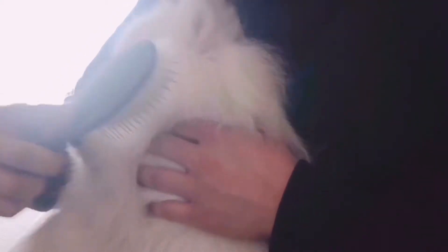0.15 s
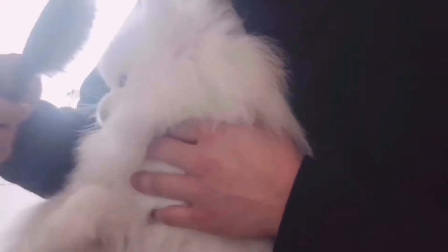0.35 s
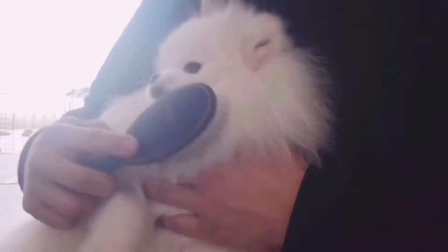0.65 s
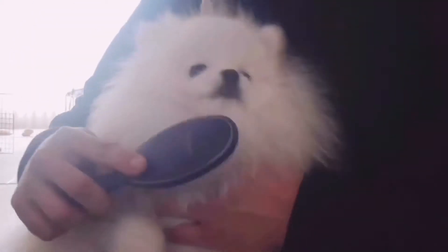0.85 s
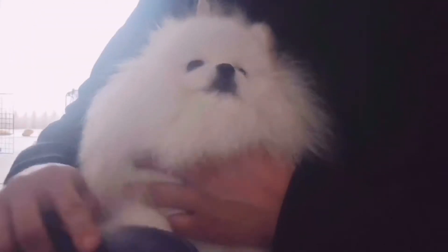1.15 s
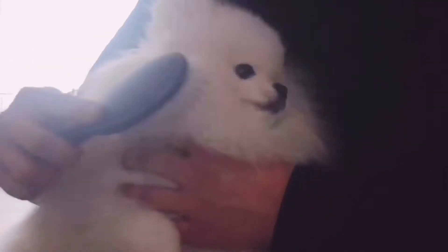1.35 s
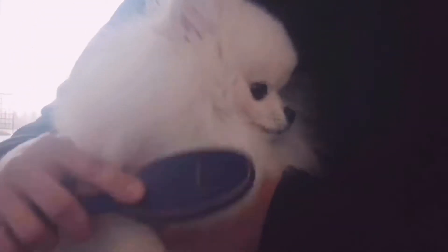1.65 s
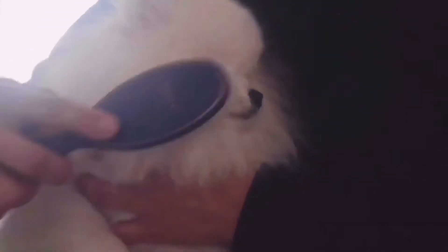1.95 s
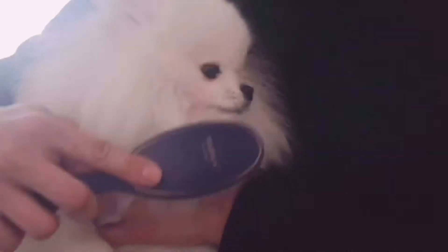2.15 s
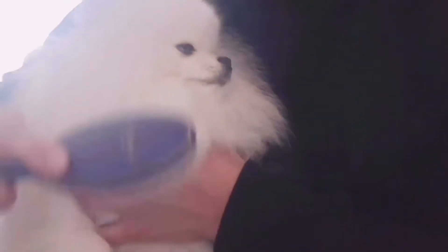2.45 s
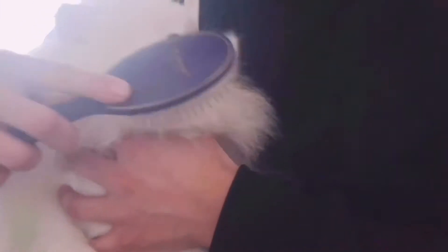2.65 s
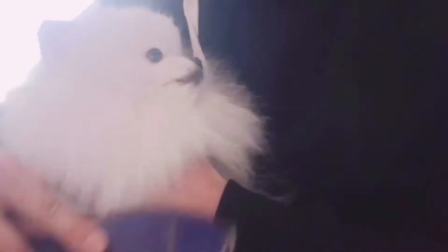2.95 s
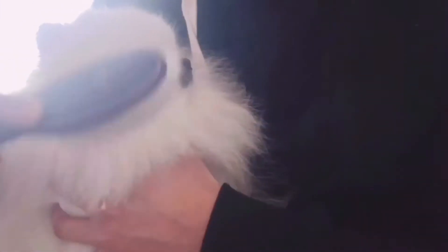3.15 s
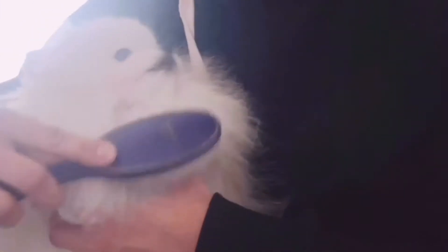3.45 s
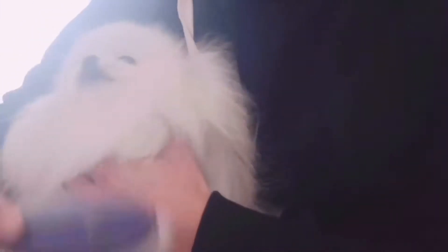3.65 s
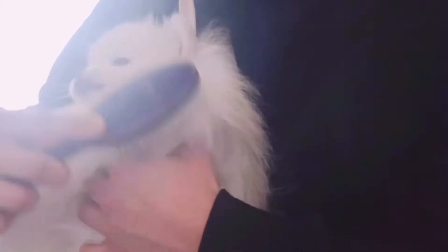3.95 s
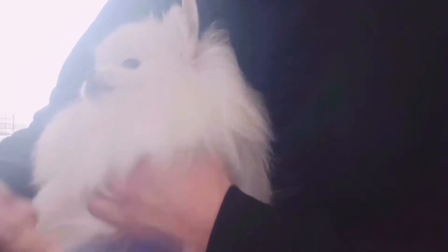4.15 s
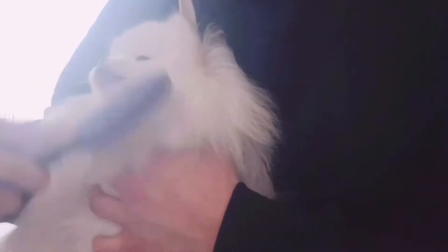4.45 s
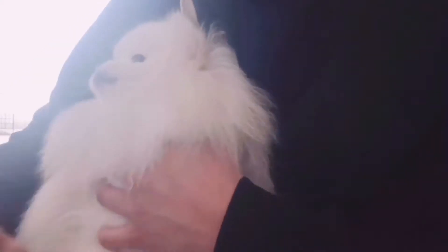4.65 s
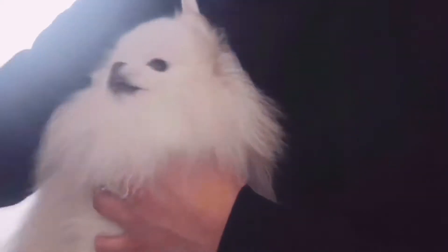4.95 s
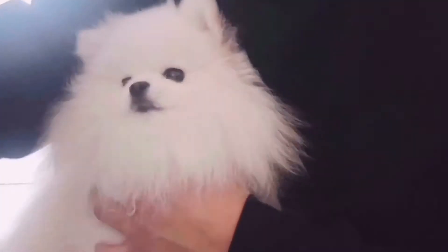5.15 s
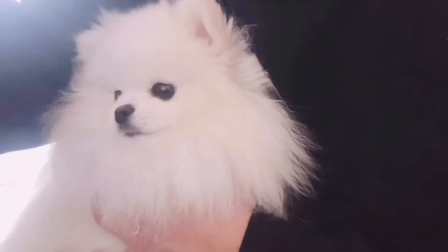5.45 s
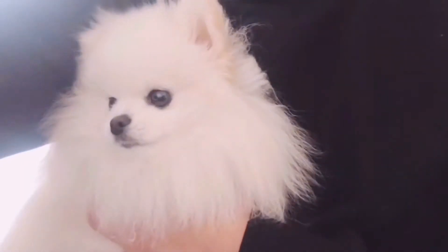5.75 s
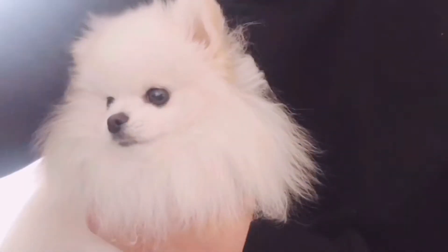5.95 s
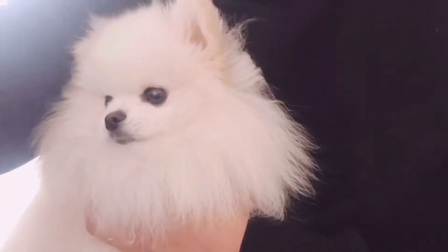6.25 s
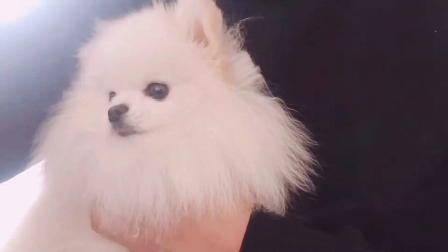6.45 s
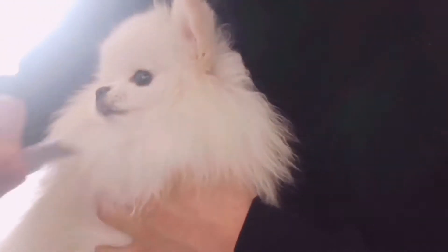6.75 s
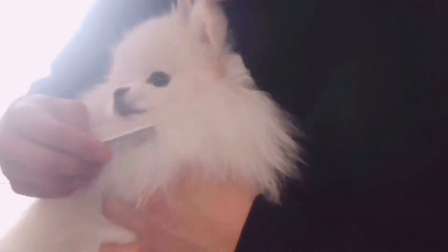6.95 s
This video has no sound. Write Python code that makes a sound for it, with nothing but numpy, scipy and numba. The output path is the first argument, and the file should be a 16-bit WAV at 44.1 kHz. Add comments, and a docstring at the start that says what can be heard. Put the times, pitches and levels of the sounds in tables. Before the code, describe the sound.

A close microphone in a quiet, lightly reverberant room, with faint low air and hum and a barely audible thin whine. From 0.6 s a bristle brush scuffs through a small dog's dry coat: short hissing strokes with a muffled, falling thrum at about 0.6, 1.0, 1.6-1.75, 2.25, 2.95, 3.55, 4.1 and 4.6 s. Tangles snap and pop, thickest around 1.05 s and 3.0 s; soft airy swishes and tiny static ticks fall between, a few near 4.9 s. Very faint bird-like whistles come at 0.4-1.0 and 3.6-3.9 s. After 5.1 s it quiets. At 5.62 s hard plastic knocks the table loudly, skids with a fading grind and small rising squeak, then knocks harder at 5.85 s. At 6.09 s a comb catches, thuds again near 6.28 s, and drags with a sinking hollow boom, rasp and toothy hiss until about 6.4 s. Only room tone remains.

```python
"""A small dog's thick coat is brushed close by in a quiet room, with faint whistles, perhaps a bird's.
First, strokes: random bristle slips hiss and thrum the pad, lower as hair pulls out; tangles snap free as
noise bursts, static ticks, and soft airy noise swishes. Then the brush is put down: knock (decaying modes),
short sinking slide (slip noise, rising squeak), knock. Last, a comb is dragged off the table: boom, rasp, hiss.
Throughout, filtered-noise air and hum and a thin whine; decaying noise adds the room's ring."""
import sys
import numpy as np
from scipy import signal
from scipy.fft import rfft, irfft
from scipy.io import wavfile
from scipy.ndimage import uniform_filter1d, map_coordinates
from numba import njit

SR = 44100
rng = np.random.default_rng(int(sys.argv[2]) if len(sys.argv) > 2 else 0)


def put_to_file(sound):
    """Save the sound as 16-bit audio at rate SR, in the file named by the first command-line argument."""
    columns = np.atleast_2d(sound).T  # one column per channel
    safe = np.clip(columns, -1, 1)
    whole_steps = np.round(safe * 32767)
    wavfile.write(sys.argv[1], SR, whole_steps.astype(np.int16))


N = 312669
TIME = np.arange(N) / SR


def amp(db):
    """Decibels to gain."""
    return 10 ** (np.asarray(db) / 20)


def unit(x):
    """Scale to rms 1."""
    return x / np.sqrt(np.mean(x ** 2))


def noise(size=N):
    """White noise."""
    return rng.standard_normal(size)


def walk(rate_hz):
    """Smooth random wandering, rms 1, through rate_hz random knots per second."""
    knots = noise(1000)
    return unit(map_coordinates(knots, [TIME * rate_hz], mode="wrap"))


def slips(rate_hz, spread_db):
    """Friction: tiny slips at random moments; spread_db skews their random sizes."""
    hits = rng.random(N) < rate_hz / SR
    return hits * noise() * amp(spread_db * np.minimum(rng.exponential(size=N), np.pi))


def along(points, hz):
    """Read (f/Hz, value) points on a log-frequency axis."""
    f, value = np.transpose(points)
    return np.interp(np.log(np.maximum(hz, 1)), np.log(f), value)


def colour(x, points, size=4096):
    """Causal minimum-phase filter with the given (f/Hz, level/dB) spectrum, via the cepstrum."""
    level_db = along(points, np.fft.rfftfreq(size, 1 / SR))
    cepstrum = irfft(np.log(amp(level_db)))
    cepstrum[1:size // 2] *= 2
    cepstrum[size // 2 + 1:] = 0
    response = irfft(np.exp(rfft(cepstrum)))
    return signal.fftconvolve(x, response)[:len(x)]


def ring(x, modes):
    """A body's resonances in parallel: (f/Hz, width/Hz, level/dB)."""
    return sum(amp(db) * signal.lfilter(*signal.iirpeak(hz, hz / width, fs=SR), x)
               for hz, width, db in modes)


@njit
def sweep(x, hz, damping):
    """Band-pass with a moving centre; damping is bandwidth over centre."""
    y, band, low = np.empty(len(x)), 0., 0.
    for i in range(len(x)):
        g = np.tan(np.pi * hz[i] / SR)
        v = (band + g * (x[i] - low)) / (1 + g * (g + damping))
        band, low, y[i] = 2 * v - band, low + 2 * g * v, damping * v
    return y


def swell(s, hold_s, rise_s, fall_s):
    """Gain that rises to 1 at time s, holds and falls; rise and fall times are per 20 dB."""
    before = (s - TIME) / max(rise_s, 1e-3)
    after = (TIME - s - hold_s) / max(fall_s, 1e-3)
    return amp(-20 * np.clip(np.maximum(before, after), 0, 10))


def fade(s, db_per_s):
    """Gain that sinks (negative rate: grows) steadily for up to 1 s from time s."""
    return amp(-db_per_s * np.clip(TIME - s, 0, 1))


def sinking_pitch(glides, lead_s):
    """Pitch that glides once for each (t/s, length/s, first f/Hz, last f/Hz)."""
    hz = np.full(N, float(glides[0][2]))
    for s, length, first_hz, last_hz in glides:
        after = TIME >= s - lead_s
        progress = np.clip((TIME[after] - s) / length, 0, 1)
        hz[after] = first_hz * (last_hz / first_hz) ** progress
    return hz


def add(out, s, sound):
    """Mix a short sound in at time s."""
    start = int(s * SR)
    out[start:start + len(sound)] += sound[:N - start]


def burst(x, size=220):
    """Scale a short sound so that its loudest 5 ms have rms 1."""
    return x / np.sqrt(uniform_filter1d(x ** 2, size=size).max())


# bristles grip the coat: t/s, length/s, relative pad pull level/dB, relative hiss level/dB
GRIPS = [(0.599, 0.016, -61, -68), (1.017, 0.095, -51.5, -58), (1.57, 0.18, -61, -71),
         (1.733, 0.021, -46, -54), (2.246, 0.064, -51, -60.5), (2.963, 0.016, -45, -53.5),
         (3.535, 0.024, -50, -57.5), (4.121, 0.04, -53, -59.5), (4.586, 0.038, -46.5, -51)]
# resonances of the brush's pad and handle: f/Hz, width/Hz, level/dB
PAD_MODES = [(322, 95, 11), (486, 115, 12), (720, 130, 5.5), (822, 39, 7.5), (1460, 290, -40)]
# rubber cushion muffling the pad: f/Hz, level/dB
CUSHION_SPECTRUM = [(80, -18), (220, 3), (900, 1), (1700, -12.5), (5000, -11)]
# bristles rubbing on hair: f/Hz, level/dB
BRISTLE_SPECTRUM = [(500, -33), (1300, 11), (1850, 0), (2800, 5.5), (4100, 2), (6500, -9), (11000, -12.5),
                    (15500, -12)]
# a lighter lead-in precedes each grip; times per 20 dB
LEAD_DB, LEAD_RISE_S, GRIP_RISE_S = -10, 0.15, 0.013
PAD_FALL_S, HISS_FALL_S = 0.037, 0.029


def brushing(start_hz=640, end_hz=390, damping=0.97, hair_db=-3):
    """Bristles rub through hair and shake the pad; the taut hair sounds lower as it pulls out."""
    pull, rub = np.zeros(N), np.zeros(N)
    for s, length, pull_db, hiss_db in GRIPS:
        lead = amp(LEAD_DB) * swell(s, 0, LEAD_RISE_S, GRIP_RISE_S)
        pull += amp(pull_db) * np.maximum(lead, swell(s, length, GRIP_RISE_S, PAD_FALL_S))
        rub += amp(hiss_db) * np.maximum(lead, swell(s, length, GRIP_RISE_S, HISS_FALL_S))
    glides = [(s, length, start_hz, end_hz) for s, length, *_ in GRIPS]
    hair_hz = sinking_pitch(glides, lead_s=0.071)
    tugs = slips(rate_hz=2300, spread_db=2.5)
    hair = sweep(sweep(tugs, hair_hz, damping), hair_hz, damping)
    pad = colour(ring(tugs, PAD_MODES), CUSHION_SPECTRUM)
    thrum = unit(unit(pad) + amp(hair_db) * unit(hair))
    hiss = unit(colour(slips(rate_hz=9000, spread_db=3.5), BRISTLE_SPECTRUM))
    return thrum * pull + hiss * rub


# tangles let go: t/s, relative tear level/dB, relative pad thump level/dB, thump f/Hz
TANGLES = [(0.726, -58.5, -54, 1180), (0.964, -60.5, -48, 430), (1.022, -47, -47.5, 460),
           (1.053, -51.5, -49, 504), (1.061, -59, -39.5, 287), (1.084, -48.5, -44, 400),
           (1.098, -47, -46, 550), (1.737, -59, -59, 700), (1.760, -72, -49, 280),
           (2.245, -49.5, -47.5, 656), (2.258, -68, -45.5, 517), (2.311, -53, -52, 400),
           (2.958, -53, -43.5, 557), (2.975, -50, -52, 650), (2.987, -53, -44, 680),
           (2.993, -54.5, -49, 560), (3.548, -76, -55, 510), (4.027, -67, -48, 684), (4.106, -76, -51, 650),
           (4.158, -55.5, -74, 500), (4.590, -47.5, -44, 507), (4.631, -53, -43.5, 332),
           (5.037, -68, -59, 1850)]


def snags(tear_s=0.0024, spring_s=0.0022, width_share=0.47):
    """A tangle tears free in milliseconds and the pad springs back, each time at its own pitch."""
    out, t = np.zeros(N), TIME[:SR // 10]
    for s, tear_db, thump_db, hz in TANGLES:
        tear = colour(noise(len(t)) * t * np.exp(-t / tear_s), BRISTLE_SPECTRUM)
        push = noise(len(t)) * t * np.exp(-t / spring_s)
        spring = ring(push, [(hz, width_share * hz, 0)])
        thump = burst(ring(spring, PAD_MODES))
        add(out, s, amp(tear_db) * burst(tear) + amp(thump_db) * thump)
    return out


# static sparks in the dry coat: t/s, relative peak level/dB
STATIC = [(1.0529, -36.5), (1.494, -33.5), (3.8894, -41.5), (3.9196, -42), (4.455, -51), (4.833, -48),
          (4.9095, -41), (4.9255, -31)]


def sparks(fade_s=0.00093):
    """Tiny bright snaps of static: exponentially decaying, treble-heavy noise."""
    out, t = np.zeros(N), TIME[:SR // 20]
    for s, db in STATIC:
        decay = noise(len(t)) * np.exp(-t / fade_s)
        snap = colour(decay, [(2000, -27), (7000, -0.5), (14000, 1.0), (17000, 7.5)])
        add(out, s, amp(db) * snap / np.abs(snap).max())
    return out


# soft airy swishes, some perhaps of fur: t/s, length/s, rise/s, fall/s (per 20 dB),
# swish level/dB, airy 12 kHz hiss level/dB
SOFT_SWISHES = [(1.5, 0.15, 0.1, 0.21, -58, -88), (1.793, 0.092, .1, 0.31, -69, -72),
                (2.25, 0.066, 0.17, 0.029, -64.5, -86), (2.907, 0.12, 0.058, .04, -73, -91),
                (4.19, 0.096, 0.056, 0.28, -67.5, -76), (4.69, 0.036, .2, .1, -73, -76),
                (4.848, 0.029, 0.06, 0.064, -67, -71), (5.026, 0.03, 0.046, 0.13, -67, -78)]
# swish: f/Hz, level/dB
SWISH_SPECTRUM = [(900, 1), (2200, 1), (4000, 0), (8000, -3.5), (11000, -7), (15500, -9.5)]
# faint airy hiss near 12 kHz, filtered twice: f/Hz, width per pass/Hz, level/dB
AIRY_MODES = [(12260, 1100, 0)]


def swishes(patchy_db=3, uneven_db=1, uneven_rate_hz=45):
    """Soft, uneven airy swishes of coloured noise; with them a high airy hiss comes and goes."""
    grains = colour(slips(rate_hz=9000, spread_db=1.5), SWISH_SPECTRUM)
    swish = unit(grains * amp(uneven_db * walk(uneven_rate_hz)))
    high_hiss = ring(ring(noise(), AIRY_MODES), AIRY_MODES)
    airy = unit(high_hiss * amp(patchy_db * walk(rate_hz=13)))
    out = np.zeros(N)
    for s, length, rise_s, fall_s, swish_db, airy_db in SOFT_SWISHES:
        out += swell(s, length, rise_s, fall_s) * (amp(swish_db) * swish + amp(airy_db) * airy)
    return out


# brush meets table: t/s, relative level/dB, face (0 rim, 1 back), room send relative to it/dB
TABLE_HITS = [(5.6182, -10.5, 0, -9.5), (5.8542, -6, 1, -7)]
# brush on table top: f/Hz, t60/s, level by rim/dB, level by back/dB
HIT_MODES = [(232, 0.083, -18, -14), (376, 0.032, -11.5, -12.5), (511.7, 0.062, -17, -4),
             (684.7, 0.073, -27, -5.5), (833.6, 0.044, -5.5, -4), (1016, 0.045, -17, -5),
             (1195, 0.044, -5, -18.5), (1463, .025, -3.5, -23), (1670, 0.042, -11.5, -2.5),
             (1930, 0.013, 0, -1), (2320, 0.037, -3.5, -2), (2600, 0.02, 0, 0), (3350, .015, -4, -3),
             (3660, 0.016, -0.5, 6), (5100, 0.0055, -14.5, -2), (7270, 0.0055, -14, 1)]
# hard contact: f/Hz, level/dB
CRACK_SPECTRUM = [(100, -15.5), (400, -3), (1000, 1), (3800, -3), (6000, -9.5), (8000, -10.5), (11000, -22),
                  (16000, -29)]


def knocks(crack_db=-5, bounce_s=.0028, bounce_db=-9, body_to_room_db=-9):
    """Hard plastic strikes the table and chatters once; each face wakes the modes differently."""
    direct, to_room, t = np.zeros(N), np.zeros(N), TIME[:SR // 4]
    crack = burst(colour(signal.unit_impulse(len(t)), CRACK_SPECTRUM))
    chatter = crack + amp(bounce_db) * np.roll(crack, int(bounce_s * SR))
    for s, db, face, room_db in TABLE_HITS:
        body = np.zeros(len(t))
        for k, (hz, t60, *mode_db) in enumerate(HIT_MODES):
            gain = (-1) ** k * amp(mode_db[round(face)])  # alternating polarity
            body += gain * np.sin(2 * np.pi * hz * t) * np.exp(-np.log(1000) * t / t60)
        body = burst(body)
        add(direct, s, amp(db) * burst(body + amp(crack_db) * chatter))
        # the crack spreads in all directions, so the room gets more of it
        add(to_room, s, amp(db + room_db) * burst(crack + amp(body_to_room_db) * body))
    # a small table radiates little bass
    return colour(direct + room(to_room), [(30, -27), (70, -7), (160, 1.5), (16000, -3.5)])


# rim skidding on the table: f/Hz, level/dB
SKID_SPECTRUM = [(59, -51.5), (100, -18), (234, -3), (315, -9.5), (365, -4.5), (662, -9), (836, 1.5),
                 (1030, -3.5), (2520, -16), (3120, -11), (3940, -22), (4870, -17), (5530, -26),
                 (13800, -36), (16000, -35.5)]
# relative levels; grind and scratch sink as the slide slows down
GRIND_DB, GRIND_FADE_DB_PER_S = -39, 20.5
SCRATCH_DB, SCRATCH_FADE_DB_PER_S = -47.5, 39.5
# midway the rim bites harder for a moment; times per 20 dB
BITE_S, BITE_DB, BITE_RISE_S, BITE_FALL_S = 5.738, -40, .07, 0.044
# thin rising squeak just before the back comes down
SQUEAK_DB, SQUEAK_RISE_S, SQUEAK_HOLD_S = -59, 0.086, .03
SQUEAK_END_HZ, SQUEAK_GLIDE_HZ_PER_S = 10500, 8600


def slide(split_hz=2500, waver_share=0.023):
    """The rim skids over the table: slips give a low grind and a scratch; an unsteady sine squeaks."""
    start, end = TABLE_HITS[0][0], TABLE_HITS[1][0]
    contact = swell(start, end - start, rise_s=0.0073, fall_s=.008)
    skid = colour(slips(rate_hz=7800, spread_db=-0.5), SKID_SPECTRUM)
    low_pass = signal.butter(3, split_hz, "low", fs=SR, output="sos")
    high_pass = signal.butter(3, split_hz, "high", fs=SR, output="sos")
    grind = unit(signal.sosfilt(low_pass, skid)) * amp(GRIND_DB) * fade(start, GRIND_FADE_DB_PER_S)
    slowing = amp(SCRATCH_DB) * fade(start, SCRATCH_FADE_DB_PER_S)
    bite = amp(BITE_DB) * swell(BITE_S, 0, BITE_RISE_S, BITE_FALL_S)
    scratch = unit(signal.sosfilt(high_pass, skid)) * np.maximum(slowing, bite)
    waver = 1 + waver_share * unit(uniform_filter1d(noise(), size=40))
    glide_hz = SQUEAK_END_HZ - SQUEAK_GLIDE_HZ_PER_S * (end - np.clip(TIME, start, end))
    tone = unit(np.sin(2 * np.pi * np.cumsum(glide_hz * waver) / SR))
    rising = swell(end - SQUEAK_HOLD_S, SQUEAK_HOLD_S, SQUEAK_RISE_S, SQUEAK_RISE_S)
    return contact * (grind + scratch + amp(SQUEAK_DB) * tone * rising)


# pulls of the comb: t at full force/s, length/s, boom rise/s (per 20 dB), boom level/dB,
# boom fade/(dB/s), rasp level/dB, teeth hiss level/dB, first boom f/Hz, last boom f/Hz; levels relative
COMB_PULLS = [(6.178, 0.0972, 0.15, -29, -22, -26.5, -37.5, 643, 410),
              (6.32, 0.05, 0.037, -31.5, 177, -57, -38, 560, 374)]
# the comb catches on the table: t/s, relative level/dB
COMB_CATCHES = [(6.087, -31), (6.235, -47), (6.276, -27.5)]
# table top: f/Hz, width/Hz, level/dB
TABLE_MODES = [(238, 120, -22), (284, 150, -11), (377, 54, -17), (514, 22, 2), (661, 19, -2),
               (772, 79, -11)]
# comb body: f/Hz, width/Hz, level/dB
COMB_MODES = [(1134, 190, -20), (1400, 230, -3.5), (1662, 79, 7), (1840, 81, -4.5), (1967, 59, 2.5),
              (2400, 140, -3), (2823, 40, -3.5), (3520, 170, -9)]
# the comb's teeth: f/Hz, level/dB
TEETH_SPECTRUM = [(2500, -9.5), (4500, -0.5), (6500, 4), (7700, 3.5), (9000, -4.5), (12500, -14.5),
                  (15500, -2.5)]
# rise and fall times per 20 dB
PULL_FALL_S, RASP_RISE_S = 0.01, 0.13
TEETH_RISE_S, TEETH_FALL_S = 0.065, 0.011
# rasp and hiss weaken as the comb speeds up
RASP_FADE_DB_PER_S, TEETH_FADE_DB_PER_S = 42, 64


def comb(damping=0.32, sink_db=2, drift_share=0.02, patchy_db=3, change_rate_hz=28, stuck_s=0.028):
    """Teeth stick and slip: the table booms, lower through each pull, the comb rasps, its teeth hiss."""
    friction = slips(rate_hz=4000, spread_db=2.0)
    glides = [(s, length, first_hz, last_hz) for s, length, *_, first_hz, last_hz in COMB_PULLS]
    hz = sinking_pitch(glides, lead_s=0.018)
    # stick-slip limits its own swing, so the sinking boom keeps a fairly even strength
    sinking = np.tanh(unit(sweep(sweep(noise(), hz, damping), hz, damping)))
    table_spectrum = [(80, -5), (200, 2.0), (800, 5.5), (2000, -21.0)]
    table = colour(ring(friction, TABLE_MODES), table_spectrum)
    boom = unit(unit(table) + amp(sink_db) * unit(sweep(sinking, hz, 1.)))
    # different teeth bear the load in turn, so the comb's resonances drift and come and go
    teeth = np.zeros(N)
    for centre, width, db in COMB_MODES:
        gain = amp(db + patchy_db * walk(change_rate_hz))
        drifting_hz = centre * (1 + drift_share * walk(change_rate_hz))
        teeth += gain * sweep(friction, drifting_hz, width / centre)
    rasp = unit(colour(teeth, [(400, -8.5), (1100, 8), (3800, 1.0), (7000, -17)]))
    hiss = unit(colour(slips(rate_hz=4900, spread_db=-1.0), TEETH_SPECTRUM))
    out = np.zeros(N)
    for s, length, rise_s, boom_db, boom_fade, rasp_db, hiss_db, *_ in COMB_PULLS:
        boom_gain = swell(s, length, rise_s, PULL_FALL_S) * fade(s, boom_fade)
        rasp_gain = swell(s, length, RASP_RISE_S, PULL_FALL_S) * fade(s, RASP_FADE_DB_PER_S)
        hiss_gain = swell(s, length, TEETH_RISE_S, TEETH_FALL_S) * fade(s, TEETH_FADE_DB_PER_S)
        out += amp(boom_db) * boom * boom_gain
        out += amp(rasp_db) * rasp * rasp_gain
        out += amp(hiss_db) * hiss * hiss_gain
    # the comb only starts to move a moment after its first catch
    return out * swell(COMB_CATCHES[0][0] + stuck_s, hold_s=1, rise_s=0.034, fall_s=1)


def catches(contact_s=0.0012, comb_db=-4, teeth_db=-15):
    """A tooth sticks, then jumps and thuds: one noise push drives table, comb and teeth."""
    out, t = np.zeros(N), TIME[:SR // 10]
    for s, db in COMB_CATCHES:
        push = noise(len(t)) * t * np.exp(-t / contact_s)
        thud = burst(colour(push, [(60, -10.0), (250, 13), (700, 10.5), (2500, -16), (5000, -53)]))
        body = amp(comb_db) * burst(ring(push, COMB_MODES))
        teeth = amp(teeth_db) * burst(colour(push, TEETH_SPECTRUM))
        add(out, s, amp(db) * burst(thud + body + teeth))
    return out


# faint thin whistles, perhaps a bird outside:
# t/s, length/s, middle f/Hz, glide/Hz, relative level/dB
WHISTLE_NOTES = [(0.367, .09, 6670, -100, -81), (0.467, .11, 7100, 0, -82), (0.743, 0.13, 6800, -2, -78),
                 (0.843, 0.19, 8200, 200, -81.5), (3.558, .09, 7250, 900, -79.5),
                 (3.68, .07, 7440, -600, -80), (3.755, 0.1, 8250, 2, -80), (3.88, .08, 6900, -1300, -79)]


def whistles(arch_share=.06, waver_share=.02):
    """Each faint sine whistle glides, arches and wavers in pitch, and swells in its middle."""
    out = np.zeros(N)
    waver = 1 + waver_share * unit(uniform_filter1d(noise(), size=40))
    for s, length, hz, glide_hz, db in WHISTLE_NOTES:
        place = np.linspace(-1, 1, int(length * SR))
        arch_hz = hz * (1 - arch_share * place ** 2)
        pitch_hz = (arch_hz + glide_hz * place / 2) * waver[:len(place)]
        tone = np.sin(2 * np.pi * np.cumsum(pitch_hz) / SR)
        add(out, s, amp(db) * unit(tone * (1 - place ** 2)))
    return out


# the room's ring: f/Hz, t60/s
RING_T60 = [(150, 0.47), (700, 0.39), (2000, 0.4), (4500, 0.48), (9000, 0.42), (16000, 0.93)]
# its colour: f/Hz, level/dB
RING_SPECTRUM = [(100, 3), (700, 5), (1500, 2), (2400, -1), (4500, 0.5), (8000, -7), (16000, -11)]


def room(x, build_s=0.00097):
    """Dense reflections, as noise, that build up quickly and die away band by band."""
    t = TIME[:SR]
    hz, spectrum = np.fft.rfftfreq(SR, 1 / SR), rfft(noise(SR))
    centres, t60s = np.transpose(RING_T60)
    tail = np.zeros(SR)
    # overlapping bands, each peaking at one centre
    for share, t60 in zip(np.eye(len(centres)), t60s):
        band = irfft(spectrum * along(np.c_[centres, share], hz))
        tail += band * np.exp(-np.log(1000) * t / t60)
    response = colour(unit(tail * (1 - np.exp(-t / build_s))), RING_SPECTRUM)
    return signal.fftconvolve(x, response)[:N] / np.sqrt(SR)


# background air: f/Hz, level/dB
AIR_SPECTRUM = [(20, -36.5), (35, -20), (55, -2.5), (85, -5), (115, -5), (145, -4.5), (200, -1.5),
                (400, -9.5), (550, -7.5), (1200, -16.5), (2400, -26), (4500, -27), (8000, -32),
                (16000, -32)]
# faint hum, filtered twice: f/Hz, width per pass/Hz, level/dB
HUM_MODES = [(58, 14, -2.5), (113.6, 10, -6)]


def quiet_room(air_db=-63.5, hum_db=-72.5):
    """Steady background air as coloured noise, with a faint hum of narrow-band noise."""
    second_pass = [(hz, width, 0) for hz, width, db in HUM_MODES]
    hum = ring(ring(noise(), HUM_MODES), second_pass)
    return amp(air_db) * unit(colour(noise(), AIR_SPECTRUM)) + amp(hum_db) * unit(hum)


def whine(centre_hz=2045, level_db=-86.5, waver_share=0.0072):
    """A faint electrical whine: a sine slightly unsteady in pitch."""
    pitch_hz = centre_hz * (1 + waver_share * walk(rate_hz=80))
    return amp(level_db) * unit(np.sin(2 * np.pi * np.cumsum(pitch_hz) / SR))


def scene():
    """The dog is close and dry, and the table further off; all but air and whine feed the room."""
    coat = amp(-1.5) * brushing() + snags() + sparks()
    coat_and_airy = coat + swishes() + whistles()
    table = slide() + comb() + catches()
    direct = coat_and_airy + table + knocks()
    reflected = room(amp(-14.5) * coat_and_airy + amp(-14.0) * table)
    return (direct + reflected + quiet_room() + whine())[None]


def record(dry, top_hz=16000):
    """The microphone rounds peaks (tanh) and cuts the top (elliptic low-pass)."""
    low_pass = signal.ellip(10, .2, 70, top_hz, fs=SR, output="sos")
    return signal.sosfilt(low_pass, np.tanh(dry))


dry = scene()
out = record(dry)
put_to_file(out)
```